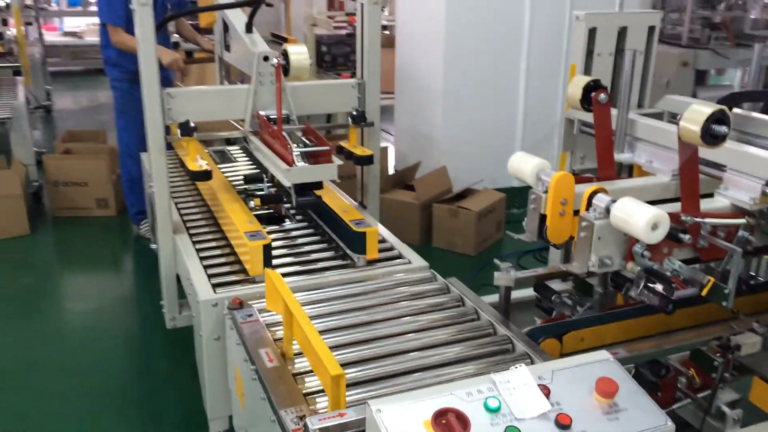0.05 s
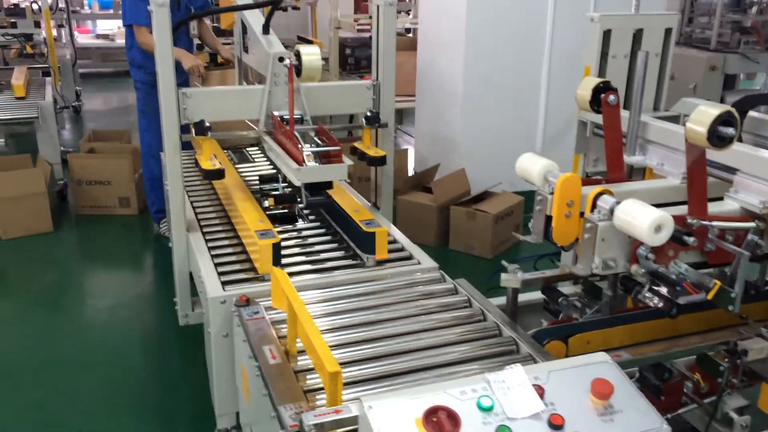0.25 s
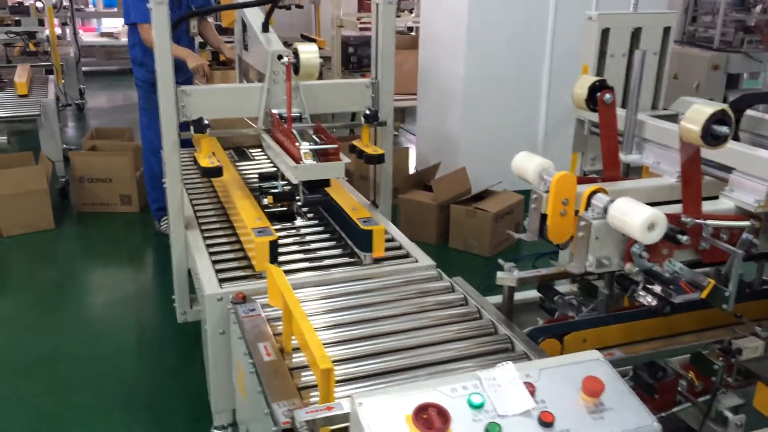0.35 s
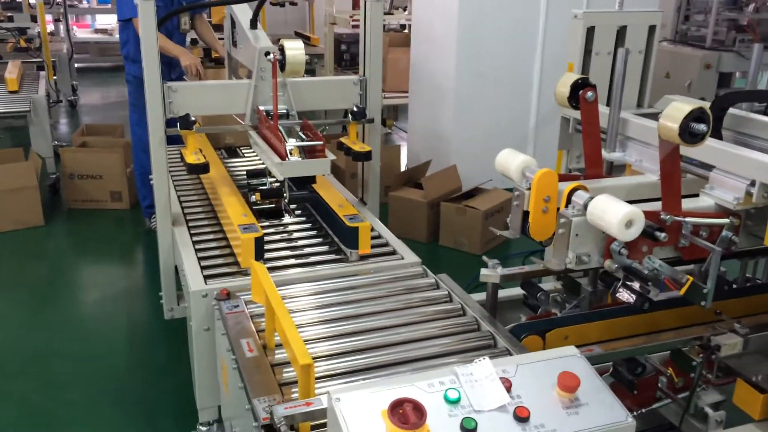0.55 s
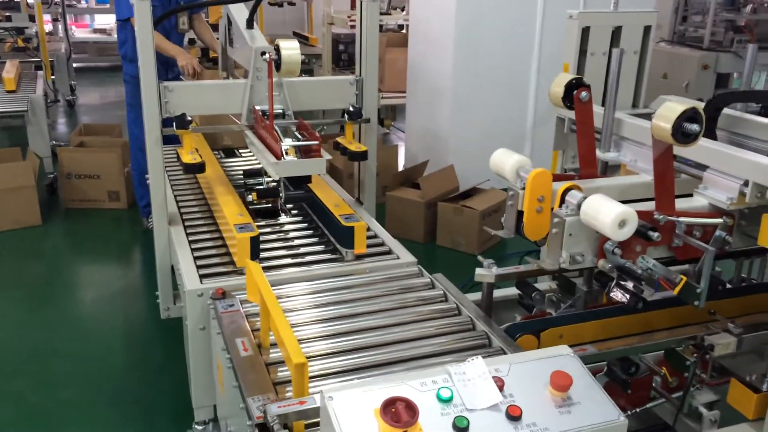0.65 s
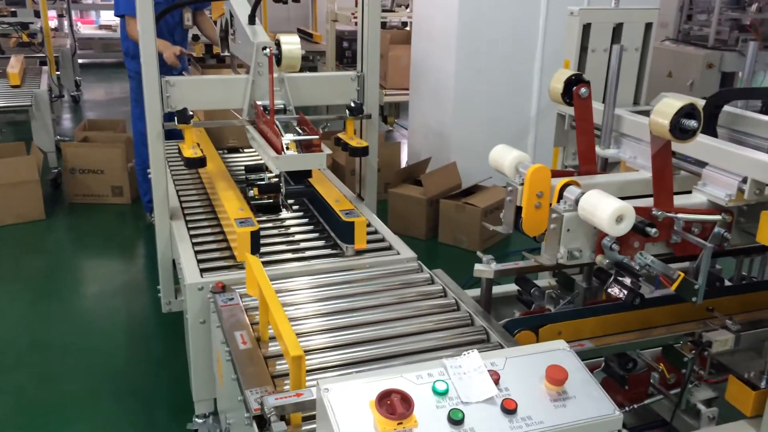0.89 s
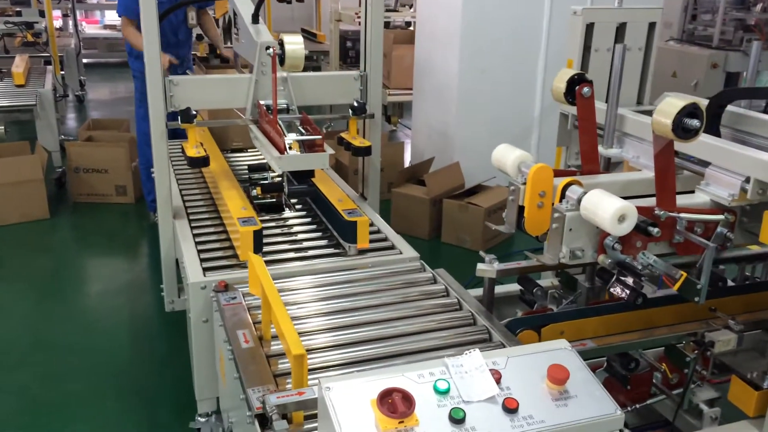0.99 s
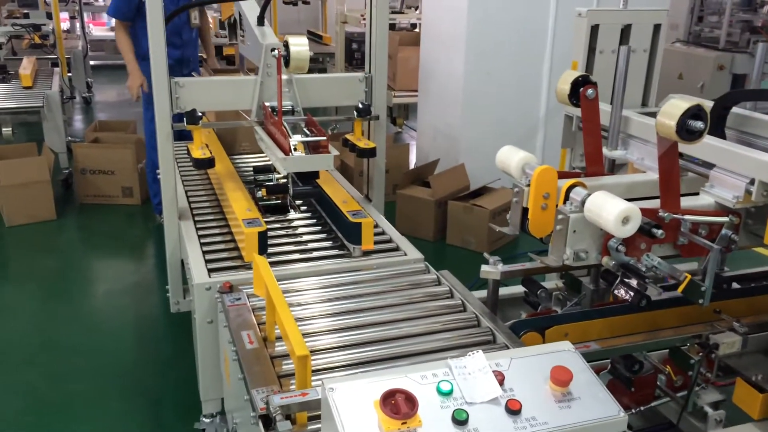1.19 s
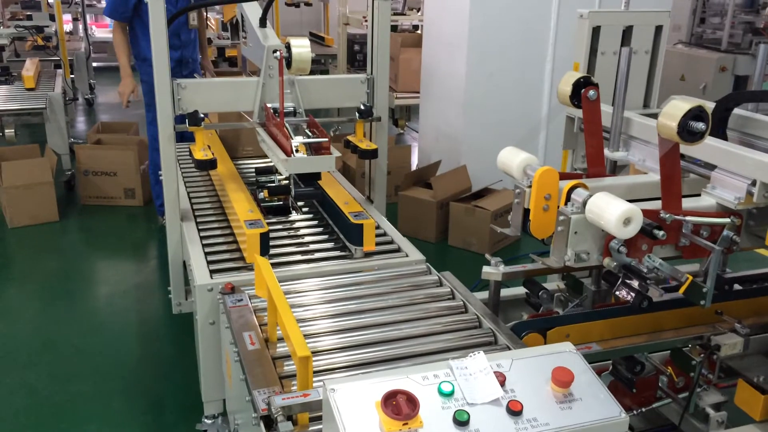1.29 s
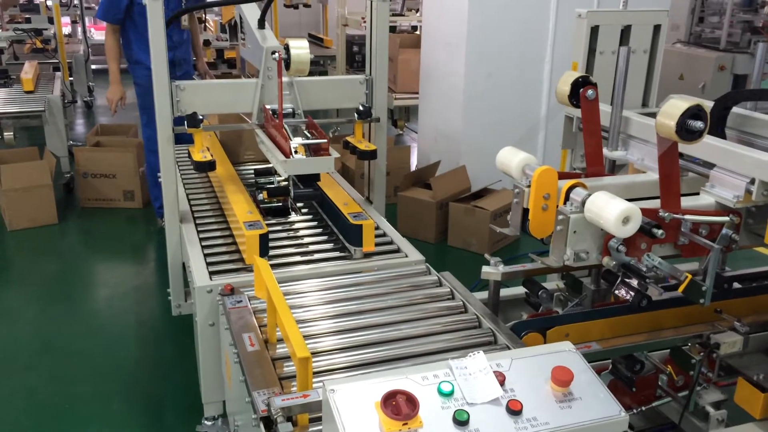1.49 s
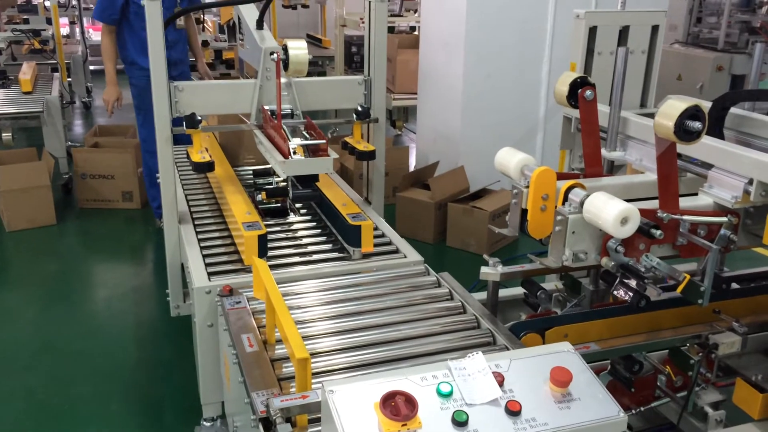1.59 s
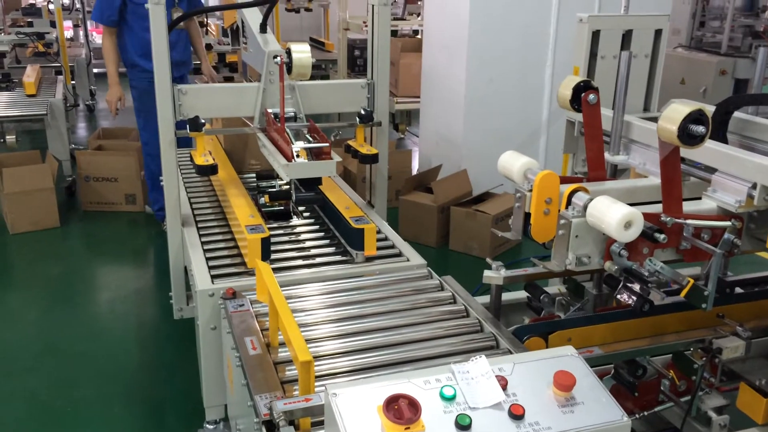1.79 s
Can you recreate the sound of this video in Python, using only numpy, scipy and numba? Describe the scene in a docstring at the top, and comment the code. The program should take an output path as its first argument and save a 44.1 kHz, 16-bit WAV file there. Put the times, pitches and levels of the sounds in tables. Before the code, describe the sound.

In an echoing factory, a packing machine slams with a sharp steel click and booming panels. A soft puff of air and a stronger hiss follow, then a carton scuffs and knocks lightly over rollers above a low hum.

```python
"""After a few faint knocks, a loud slam: the air-driven stop of a carton sealing machine hits home
with steel clicks and a bouncing thud that sets the sheet-metal frame booming. Valves blow off air,
a carton bumps and scuffs along the rollers, and a motor hums. The factory hall echoes behind it
all, and an automatic volume control turns the sound down briefly after the slam."""
import sys
import numpy as np
from scipy import signal
from scipy.fft import rfft, irfft
from scipy.io import wavfile
from scipy.ndimage import uniform_filter1d, minimum_filter1d
from numba import njit

SR = 44100
rng = np.random.default_rng(int(sys.argv[2]) if len(sys.argv) > 2 else 0)


def bounce(signal):
    """Save signal as a 16-bit WAV file at the path given by the first command-line argument."""
    frames = np.transpose(np.atleast_2d(signal))
    limited = np.clip(frames, -1, 1)
    pcm = np.round(limited * 32767).astype(np.int16)
    wavfile.write(sys.argv[1], SR, pcm)


N = 81585

# blows on the frame (time [s], level [dB], contact time [ms])
FRAME_BLOWS = [(0.089, -29, 8.5), (0.12, -26, 2.4), (0.2436, -2, 2.8), (0.2496, -3.5, 2.7),
               (.2585, 3.5, 2.3), (.626, -14, 1.94), (0.763, -22, 0.84)]
# notes the frame rings at (pitch [Hz], level [dB], time to fade by 60 dB [s])
FRAME_NOTES = [(87.74, -17, 1.2), (137, -28.5, 0.19), (150.7, -13.5, 0.22), (185.4, -14.5, 0.4),
               (215.3, -19, 0.62), (241.1, -13, 0.38), (266.3, -11, .16), (294, -26.5, 0.23),
               (413.4, -19.5, .2), (438, -23, 0.26), (603, -22.5, 0.39), (844, -9.5, 0.073),
               (1190, -41, .06)]
# tone of the loose panels (frequency [Hz], level [dB])
RATTLE_TONE = [(40, -30), (90, -13), (150, -4), (240, 2.5), (380, -1), (550, -14), (1000, -25.5),
               (2000, -37.5), (5000, -41.5), (10000, -52.5), (14000, -69)]


def frame_slam(boom_db=2, rattle_db=-22):
    """Each blow is a short push that makes the frame ring and shakes its loose panels."""
    t, force, shake = clock(), np.zeros(N), np.zeros(N)
    for start, db, contact_ms in FRAME_BLOWS:
        age = np.maximum(t - start, 0) * 1000 / contact_ms
        push = age * np.exp(-2 * np.pi * age)
        force -= gain(db) * push / push.sum()
        shake += (gain(db) * fade(start, fade_s=.85, rise_s=.0053)) ** 2
    ring = sum(gain(db) * np.sin(2 * np.pi * hz * t) * fade(0, fade_s) for hz, db, fade_s in FRAME_NOTES)
    boom = gain(boom_db) * signal.fftconvolve(force, ring)[:N]
    boom = pass_only(boom, "high", hz=110)  # open panels give off little deep bass
    return echo(boom, echo_db=-7.5) + gain(rattle_db) * np.sqrt(shake) * noise(RATTLE_TONE)


# soft jolts that each make one panel boom (time [s], level [dB], pitch [Hz])
PANEL_JOLTS = [(.1, -36, 171), (.248, -14, 247.4), (.28, -10.5, 86), (.415, -14.5, 111.6),
               (0.476, -30.5, 90), (.506, -17, 232), (0.567, -18, 88.6), (0.619, -22, 250),
               (.636, -23, 119), (.662, -15.5, 222), (0.687, -22, 129.4), (.757, -21, 239),
               (.76, -21, 87.7), (0.823, -35, 91), (0.886, -32, 227), (.988, -22, 220), (1.12, -41, 97),
               (1.717, -33, 90.6), (1.787, -31.5, 89)]


def panel_booms(swell_s=.015):
    """A jolted panel swells into a low boom and dies away."""
    booms = np.zeros(N)
    for start, db, hz in PANEL_JOLTS:
        age = np.maximum(clock() - start, 0)
        swell = age / swell_s
        booms += gain(db) * (swell * np.exp(1 - swell)) ** 2 * np.sin(2 * np.pi * hz * age)
    return echo(booms, echo_db=-19)


# clicks of the stop (time [s], level [dB], time to fade by 60 dB [s])
STOP_CLICKS = [(.2437, -13.5, 0.0092), (.2475, -34.5, 0.038), (.2578, -27, 0.014)]
# tone of struck steel (frequency [Hz], level [dB])
STEEL_TONE = [(500, 11), (1800, -6.5), (2300, -21.5), (2860, 0), (3600, -14), (5200, -14), (6100, -4),
              (6600, 0.5), (7300, -17), (8200, -3), (8800, -1.5), (9400, -12), (12000, -16), (13300, -22),
              (15500, -30)]


def stop_clicks():
    """The steel stop hits home with bright clicks that die at once."""
    return echo(hits(STOP_CLICKS, STEEL_TONE), echo_db=-16)


# puffs of air (time [s], spit level [dB], spit fade time [s], flow level [dB], flow length [s],
# flow drop [dB per s], brightness [dB per octave], opening time [s])
AIR_PUFFS = [(0.6, -34, 0.37, -45, .2, 13, -1.5, 0.0055), (0.763, -53, .1, -47, 0.075, -5, -1.5, 0.033),
             (0.9933, -28.5, 0.093, -42, 0.2, 5, -1, 0.00072),
             (1.0053, -23.5, 0.081, -27, 0.25, 37.5, 0.5, 0.002),
             (1.586, -70, 0.042, -63.5, 0.22, -2, 3, 0.023)]
# tones of the first spit and of the flow after it (frequency [Hz], level [dB])
SPIT_TONE = [(300, 4.5), (1000, -24), (1700, -3.5), (2400, -3.5), (3500, -2), (4600, -5), (5700, -18),
             (6400, -1.5), (7200, -8.5), (10000, -11), (13000, -17), (15500, -21.5)]
FLOW_TONE = [(300, 0.5), (1000, 0), (2400, -6.5), (3700, 2.5), (4800, 4.5), (5700, 1), (6400, 3),
             (7100, -3), (8200, -4.5), (10200, -6.5), (12500, -13.5), (15500, -22)]


def air_valves(closing_s=.45):
    """A valve opens with a spit, then air hisses on, weakening as the cylinder empties."""
    air = np.zeros(N)
    for start, spit_db, spit_fade_s, flow_db, length_s, drop, tilt_db, opening_s in AIR_PUFFS:
        spit_level = gain(spit_db) * fade(start, spit_fade_s, opening_s, hold_s=.022)
        air += spit_level * noise(SPIT_TONE, tilt_db)
        pressure = gain(flow_db - drop * np.maximum(clock() - start, 0))  # a negative drop swells
        air += pressure * fade(start, closing_s, opening_s, length_s) * noise(FLOW_TONE, tilt_db)
    return echo(air, echo_db=-5)


# dull knocks in and around the slam (time [s], level [dB], time to fade by 60 dB [s])
DULL_KNOCKS = [(.095, -43.5, 0.75), (.16, -51, 0.41), (.2445, -26, 0.063), (.2575, -15, 0.021),
               (.622, -30.5, 0.18), (.7605, -32, 0.15), (.938, -35, 0.48), (1.314, -33.5, 0.2),
               (1.345, -32.5, 0.17), (1.458, -34, 0.11)]
# tone of those knocks (frequency [Hz], level [dB])
KNOCK_TONE = [(120, -18), (350, -1), (650, 2), (900, -0.5), (1250, -0.5), (1700, -9), (3000, -16),
              (6000, -33.5), (14000, -53)]


def dull_knocks():
    """Two sharp knocks within the slam, and softer bumps of the carton before and after it."""
    return echo(hits(DULL_KNOCKS, KNOCK_TONE), echo_db=-7)


# loudness of the sliding carton (time [s], level [dB])
SCUFF_LEVEL = [(0, -46.5), (.55, -48), (.9, -37), (1.08, -34), (1.28, -39.5), (1.42, -38), (1.55, -43),
               (1.65, -45.5), (1.85, -47.5)]
# tone of rubbing cardboard (frequency [Hz], level [dB])
SCUFF_TONE = [(100, -1), (220, 6.5), (290, -1.5), (350, 3.5), (430, -2), (600, -11.5), (950, -4),
              (1500, -7), (2500, -13.5), (6000, -20), (14000, -44.5)]


def carton_scuff(rough_db=2.0):
    """Cardboard scuffs unevenly over the rollers."""
    return noise(SCUFF_TONE) * curve(SCUFF_LEVEL) * gain(rough_db * wobble(per_second=59.97))


# loudness of the motor and of the conveyor (time [s], level [dB])
MOTOR_LEVEL = [(0, -57), (.9, -46), (1.38, -48), (1.52, -37.5), (1.63, -38.5), (1.72, -43.5), (1.85, -40.5)]
CONVEYOR_LEVEL = [(0, -49.5), (.5, -65), (.8, -35.5), (1.1, -41.5), (1.4, -80), (1.68, -47), (1.85, -48)]
# tone of the conveyor's rumble (frequency [Hz], level [dB])
CONVEYOR_TONE = [(30, -23), (60, -36.5), (88, 13.5), (110, 7), (170, 1), (400, -45.5)]


def motor_and_conveyor(turning_hz=85.1, waver=.0023, low_note_db=-7):
    """The motor hums, strongest at twice its turning rate, over the conveyor's rumble."""
    pitch_hz = turning_hz * (1 + waver * wobble(per_second=7.1))
    phase = 2 * np.pi * np.cumsum(pitch_hz) / SR
    hum = np.sin(2 * phase) + gain(low_note_db) * np.sin(phase)
    rumble = noise(CONVEYOR_TONE) * curve(CONVEYOR_LEVEL)
    return np.sqrt(2) * hum * curve(MOTOR_LEVEL) + rumble


# tone of the far-off machines (frequency [Hz], level [dB])
FACTORY_TONE = [(30, -3), (85, 7), (170, -0.5), (260, -2), (400, -17), (600, -3), (900, -3), (1400, -11),
                (2000, -10), (3000, -22.5), (5000, -28), (8000, -36), (15000, -45)]


def distant_machines(level_db=-45):
    """Far-off machines blend into one steady wash of noise."""
    return noise(FACTORY_TONE) * gain(level_db)


def echo(x, echo_db, split_hz=2900, build_s=.012):
    """Adds the hall's smooth echo, in which the high sounds die first."""
    low = pass_only(rng.standard_normal(N), "low", split_hz)
    high = pass_only(rng.standard_normal(N), "high", split_hz)
    tail = low * fade(0, fade_s=1.3, rise_s=build_s) + high * fade(0, fade_s=.36, rise_s=build_s)
    return x + gain(echo_db) * signal.fftconvolve(x, tail / np.linalg.norm(tail))[:N]


def gain(db):
    """Turns decibels into a number to multiply by."""
    return 10 ** (np.asarray(db) / 20)


def clock():
    """Time of each sample in seconds."""
    return np.arange(N) / SR


def curve(points):
    """Loudness that glides through (time [s], level [dB]) points."""
    return gain(np.interp(clock(), *np.array(points).T))


def fade(start, fade_s, rise_s=.00056, hold_s=0):
    """Loudness that rises, holds, then falls by 60 dB every fade_s."""
    age = clock() - start
    return np.clip(age / rise_s, 0, 1) * np.exp(-np.log(1000) * np.maximum(age - hold_s, 0) / fade_s)


def noise(tone, tilt_db=0):
    """Noise of strength 1 with the given tone, brightened by tilt_db per octave."""
    hz, db = np.array(tone).T
    octave = np.log2(np.maximum(np.fft.rfftfreq(N, 1 / SR), 1))
    bass_cut_db = 12 * np.maximum(np.log2(hz[0]) - octave, 0)
    shape_db = np.interp(octave, np.log2(hz), db) + tilt_db * octave - bass_cut_db
    x = irfft(rfft(rng.standard_normal(N)) * gain(shape_db), N)
    return x / x.std()


def hits(rows, tone):
    """Quickly fading bursts of noise that share one tone."""
    return noise(tone) * sum(gain(db) * fade(start, fade_s) for start, db, fade_s in rows)


def wobble(per_second):
    """A smooth random wiggle of about size 1."""
    size = int(SR / per_second)
    steps = np.repeat(rng.standard_normal(N // size + 1), size)
    x = uniform_filter1d(uniform_filter1d(steps, size), size)[:N]
    return x / x.std()


def pass_only(x, side, hz):
    """Keeps the "low" or "high" side of a sound."""
    return signal.sosfilt(signal.butter(2, hz, side, fs=SR, output="sos"), x)


@njit
def follow_loudness(x, rise_s, fall_s):
    """Tracks loudness, rising and falling at separate speeds."""
    out, level = np.empty(len(x)), 0.
    for i in range(len(x)):
        lag_s = rise_s if abs(x[i]) > level else fall_s
        level += (abs(x[i]) - level) / (lag_s * SR)
        out[i] = level
    return out


def scene():
    """The machine and the hall around it, in one channel."""
    impacts = frame_slam() + panel_booms() + stop_clicks() + dull_knocks()
    return (impacts + air_valves() + motor_and_conveyor() + carton_scuff() + distant_machines())[None]


def record(dry):
    """Turns the volume down after loud blows, holds back the peaks and cuts the highest treble."""
    loud_db, peak_db, top_hz = -20, -3, 15400
    loudness = follow_loudness(dry[0], rise_s=.025, fall_s=.6)
    x = dry / np.sqrt(np.maximum(loudness / gain(loud_db), 1))  # halves the decibels above loud_db
    window = int(.004 * SR)
    peak_gain = 1 / np.maximum(abs(x) / gain(peak_db), 1)
    x = x * uniform_filter1d(minimum_filter1d(peak_gain, 2 * window), window)
    return signal.sosfilt(signal.ellip(10, .2, 80, top_hz, fs=SR, output="sos"), x)


dry = scene()
out = record(dry)
bounce(out)
```